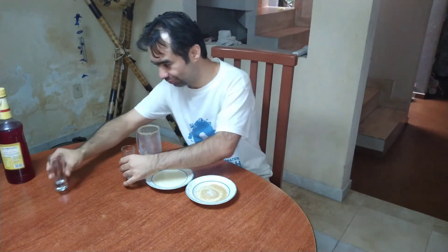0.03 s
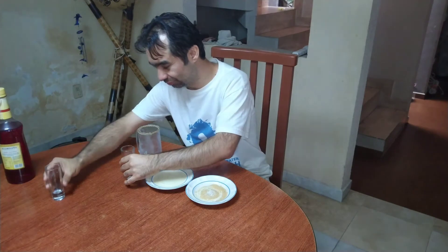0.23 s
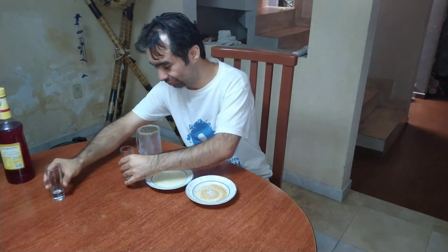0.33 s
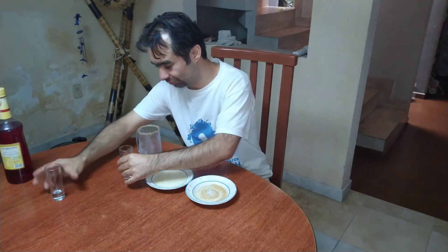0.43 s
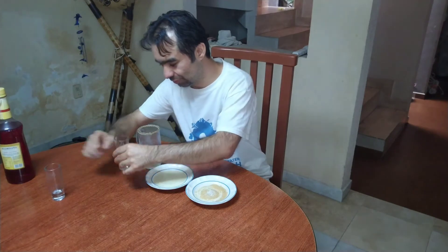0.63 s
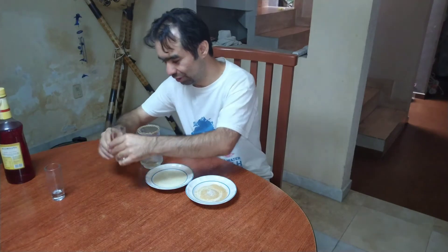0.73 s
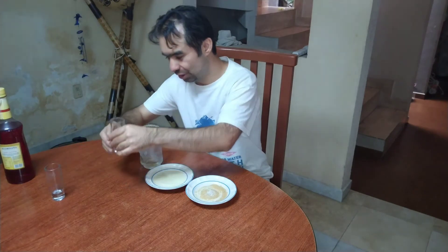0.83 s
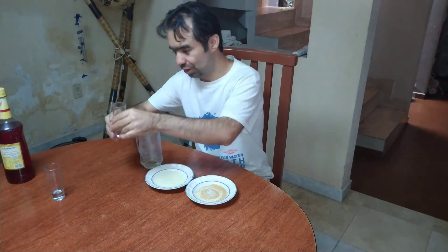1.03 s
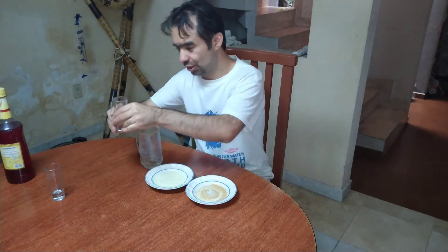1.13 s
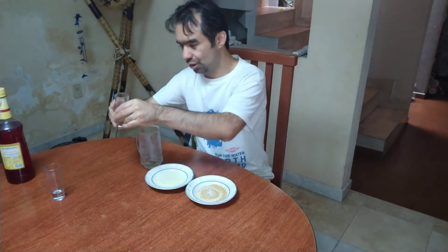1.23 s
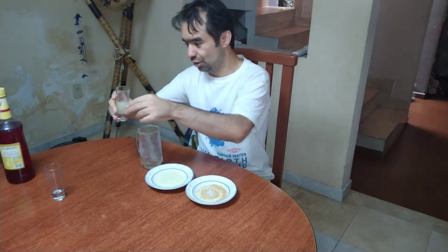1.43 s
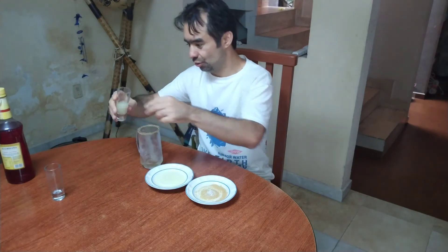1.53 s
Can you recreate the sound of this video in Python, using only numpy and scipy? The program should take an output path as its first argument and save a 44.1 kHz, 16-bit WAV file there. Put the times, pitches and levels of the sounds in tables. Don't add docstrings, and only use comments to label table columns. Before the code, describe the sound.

A small thick glass knocks hard once on a wooden table in a bare, tiled room.

```python
import sys
import numpy as np
from scipy import signal
from scipy.fft import rfft, irfft
from scipy.io import wavfile
from scipy.ndimage import uniform_filter1d

SR = 44100
rng = np.random.default_rng(int(sys.argv[2]) if len(sys.argv) > 2 else 0)


def master(y):
    cut = np.clip(np.atleast_2d(y).T, -1, 1)
    pcm = np.round(cut * 32767)
    wavfile.write(sys.argv[1], SR, pcm.astype(np.int16))


def convert_level_to_amplitude(level_db):
    exponent = np.asarray(level_db, float) / 20
    return 10 ** exponent


N = 70560

# t/s, level/dB
SWELL = [(0, -51), (.09, -56.5), (0.192, -49), (.36, -56), (.5, -52), (.59, -51), (.63, -46.5), (.69, -47),
         (.77, -43.5), (.83, -46.5), (0.942, -53.5), (0.986, -48), (1.075, -52), (1.12, -47), (1.24, -46),
         (1.35, -49), (1.45, -51.5), (1.6, -47)]
# f/Hz, density/dB per Hz
HISS_SPECTRUM = [(500, -13), (1250, -7.5), (3000, -8), (5500, -11), (7300, -8.5), (9000, -1.5),
                 (10600, -13.5), (15500, -20.5)]
# f/Hz, density/dB per Hz
RUMBLE_SPECTRUM = [(20, 5), (38, -9), (75, -4.5), (140, -9.5), (200, -3), (330, -7), (500, -7.5),
                   (900, -28)]
# f/Hz, width/Hz, level/dB
DRONES = [(51.9, 8, -58), (97, 3.8, -67), (119, 8.3, -64), (245.8, 24, -66.5)]
# f/Hz, level/dB, t60/s, left minus right/dB
TABLE_MODES = [(185.3, -6, .25, -0.5), (206.5, -13, 0.15, 3), (260.4, -14, 0.5, 4.5), (306.7, 4, 0.14, -4),
               (418, -6, 0.52, 0), (394.4, -10, .12, -7.5), (865, -15, 0.52, 4), (628.7, -1.5, .13, -13),
               (790, -13, 0.31, 20.5), (826.7, -12, 0.37, -12), (922, -10.5, 0.3, -7),
               (1125, -3.5, 0.17, 0.5), (1210, -15, 0.15, -20), (1331, -11, .12, -13)]
# f/Hz, level/dB, t60/s, left minus right/dB
GLASS_MODES = [(1480, -5, .022, -3), (2160, -24, .08, 0), (3520, -16, .018, 0)]
# f/Hz, t60/s
ROOM_T60 = [(100, 0.32), (300, 0.457), (700, 0.5163), (1500, 0.4342), (3000, 0.4324), (6000, 0.38),
            (12000, 0.01)]
# f/Hz, level/dB
ROOM_COLOUR = [(100, -37), (170, 0.5), (400, 2.5), (900, 4), (2000, 3.5), (4000, -1.5), (8000, 6.5),
               (13000, 11.5)]
# f/Hz, correlation/1
LIKENESS = [(60, 0.82), (180, 0.94), (550, 0.4), (1650, -0.09), (4970, 0), (15000, 0.1)]

KNOCK_S = 0.2392
SPREAD_S = 0.13
SIDES = np.array([[1], [-1]])


def at_hz(points, hz):
    table_hz, value = np.transpose(points)
    return np.interp(np.log(hz), np.log(table_hz), value)


def rms_one(x):
    return x / np.sqrt(np.mean(x ** 2) + 1e-20)


def drift(rate_hz):
    step = 40
    pole = np.exp(-2 * np.pi * rate_hz * step / SR)
    white = rng.standard_normal(N // step + 2002)
    slow = signal.lfilter([1], [1, -2 * pole, pole * pole], white)[2000:]
    return np.interp(np.arange(N) / step, np.arange(len(slow)), rms_one(slow))


def band_pass(x, edges_hz):
    return signal.sosfilt(signal.butter(2, edges_hz, "band", fs=SR, output="sos"), x)


def diffuse_noise(gain_at, size):
    settle = 8000
    edges_hz = 19 * 2 ** np.arange(0, 9.9, 1 / 3)
    white = rng.standard_normal((2, 2, size + settle))
    out = 0
    for k, (low_hz, high_hz) in enumerate(zip(edges_hz, edges_hz[1:])):
        mid, side = band_pass(white[k % 2], [low_hz, high_hz])[:, settle:]
        hz = np.sqrt(low_hz * high_hz)
        alike = np.clip(at_hz(LIKENESS, hz), -1, 1)
        stereo = np.sqrt(1 + alike) * mid + np.sqrt(1 - alike) * side * SIDES
        out = out + gain_at(hz) * stereo
    return out


def hiss(swell_db):
    trim_db, patchy_db, patchy_hz = 4, 2.5, 7.9

    def gain_at(hz):
        below_db = -40 * (hz < HISS_SPECTRUM[0][0])
        return convert_level_to_amplitude(at_hz(HISS_SPECTRUM, hz) + below_db + patchy_db * drift(patchy_hz))

    return convert_level_to_amplitude(swell_db + trim_db) * rms_one(diffuse_noise(gain_at, N))


def rumble(swell_db):
    level_db, patchy_db, follow = -56, -0.23, 0.53
    together = drift(15)

    def gain_at(hz):
        above_db = -60 * (hz > RUMBLE_SPECTRUM[-1][0])
        lumps = 0.38 * together + drift(6.6)
        return convert_level_to_amplitude(at_hz(RUMBLE_SPECTRUM, hz) + above_db + patchy_db * lumps)

    noise = diffuse_noise(gain_at, N)
    return convert_level_to_amplitude(level_db + follow * (swell_db - swell_db.mean())) * rms_one(noise)


def drones():
    out = 0
    for hz, width_hz, db in DRONES:
        pole = np.exp(-np.pi * width_hz / SR)
        resonance = [1, -2 * pole * np.cos(2 * np.pi * hz / SR), pole * pole]
        white = rng.standard_normal((2, N + SR))
        mid, side = signal.lfilter([1, 0, -1], resonance, white)[:, SR:]
        out = out + convert_level_to_amplitude(db) * rms_one(mid + 0.3 * side * SIDES)
    return out


def lead_in():
    lead_s, level_db, right_drop_db = 0.011, -30, 20
    t = np.arange(N) / SR - KNOCK_S + lead_s
    burst = band_pass(rng.standard_normal(N), (250, 1600)) * (t > 0) * (t < lead_s + 0.003)
    return convert_level_to_amplitude(level_db - np.array([[0], [right_drop_db]])) * burst


def knock():
    level_db, left_lag_s = -11, 0.00023
    thump_db, contact_hz = 10.5, 1760
    tick_db, tick_hz = -9, 3360
    t, hz = np.arange(N) / SR, np.fft.rfftfreq(N, 1 / SR)
    rings = 0
    for mode_hz, db, t60_s, pan_db in TABLE_MODES + GLASS_MODES:
        decay = convert_level_to_amplitude(-60 * t / t60_s)
        rings = rings + convert_level_to_amplitude(db + SIDES * pan_db / 2) * decay * np.sin(2 * np.pi * mode_hz * t)
    thump = convert_level_to_amplitude(thump_db) * 10 / (1 + 1j * hz / contact_hz) ** 3
    tick = convert_level_to_amplitude(tick_db) * 10 / (1 + 1j * hz / tick_hz) ** 2
    arrival_s = KNOCK_S + np.array([[left_lag_s], [0]])
    travel = np.exp(-2j * np.pi * (hz * arrival_s + 2 * SPREAD_S * np.sqrt(hz)))
    rings = irfft(rfft(rings) * travel, N)
    pulse = irfft((thump + tick) * travel, N)
    return convert_level_to_amplitude(level_db) * rings, convert_level_to_amplitude(level_db) * pulse


def scatter(grit, level_db, t60_s, edges_hz, t):
    return convert_level_to_amplitude(level_db) * band_pass(grit * (t > 0) * convert_level_to_amplitude(-60 * np.abs(t) / t60_s), edges_hz)


def crack():
    rim_hz = (1400, 3700)
    t = np.arange(N) / SR - KNOCK_S - SPREAD_S / np.sqrt(rim_hz[1])
    rim, sheen = rng.standard_normal((2, 2, N))
    rim = rim * rng.exponential(1, (2, N))
    return scatter(rim, -7, 0.021, rim_hz, t) + scatter(sheen, -36, 0.21, (2600, 10200), t)


def room(x):
    level_db, build_s = -23.5, 0.0018
    lump_db, lump_hz = 1.5, 250
    t = np.arange(SR // 2 + SR // 4) / SR

    def gain_at(hz):
        return convert_level_to_amplitude(at_hz(ROOM_COLOUR, hz) - 60 * t / at_hz(ROOM_T60, hz))

    echo = diffuse_noise(gain_at, len(t)) * (1 - np.exp(-t / build_s))
    echo = echo * convert_level_to_amplitude(lump_db * drift(lump_hz)[:len(t)])
    return convert_level_to_amplitude(level_db) * signal.fftconvolve(x[None], echo, axes=1)[:, :N]


def scene():
    low_cut_hz, top_cut_hz = 156, 12000
    swell_db = np.interp(np.arange(N) / SR, *np.transpose(SWELL))
    background = hiss(swell_db) + rumble(swell_db) + drones()
    rings, pulse = knock()
    reflected = room(pulse[1] + 0.027 * rings[1])
    struck = lead_in() + rings + pulse + crack() + reflected
    struck = signal.sosfilt(signal.butter(8, low_cut_hz, "high", fs=SR, output="sos"), struck)
    struck = signal.sosfilt(signal.butter(8, top_cut_hz, fs=SR, output="sos"), struck)
    return background + struck


def gate(x):
    dip_db, quiet_db, from_hz = -2.7, -72, 1100
    under_loud_db, top_hz = -56, 10800
    turn = np.array([[1, 0.96], [1, -0.99]]) / np.sqrt(2)
    hz, _, z = signal.stft(turn @ x, SR, nperseg=2048)
    hz = hz[:, None]
    power = np.abs(z) ** 2
    narrow = np.repeat(power[:, :1024].reshape(2, 128, 8, -1).mean(axis=2), 8, axis=1)
    narrow = np.concatenate([narrow, power[:, -1:]], axis=1)
    wide = uniform_filter1d(power, size=64, axis=1)
    weak = (narrow < wide * convert_level_to_amplitude(2 * dip_db)) & (hz > from_hz) & (wide < convert_level_to_amplitude(2 * quiet_db))
    loudest = power.max(axis=(0, 1))
    masked = (narrow < loudest * convert_level_to_amplitude(2 * under_loud_db)) & (hz > top_hz)
    return turn @ signal.istft(z * ~(weak | masked), SR, nperseg=2048)[1][:, :N]


def roll_off(x):
    return signal.sosfilt(signal.butter(12, 16100, fs=SR, output="sos"), x)


def record(dry):
    ceiling, top_cut_hz = 1.7, 16700
    rounded = ceiling * np.tanh(dry / ceiling)
    sos = signal.cheby2(12, 70, top_cut_hz, fs=SR, output="sos")
    mix = gate(signal.sosfilt(sos, rounded))
    return roll_off(mix)


dry = scene()
out = record(dry)
master(out)
```